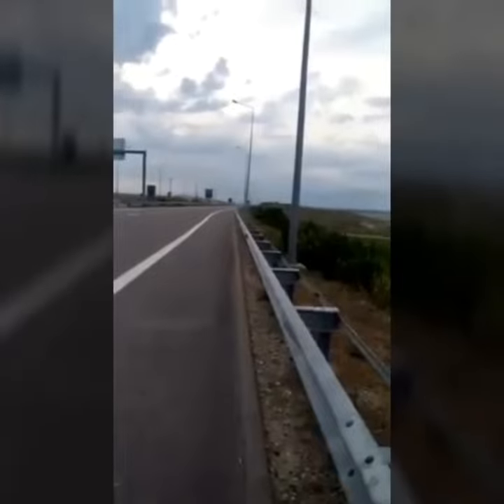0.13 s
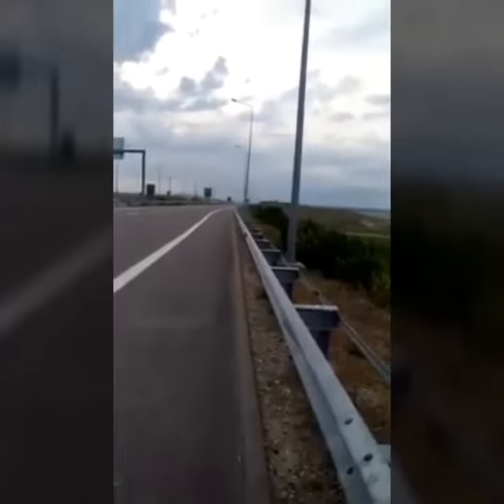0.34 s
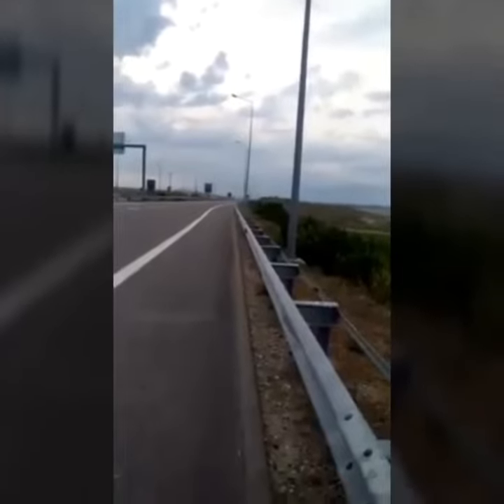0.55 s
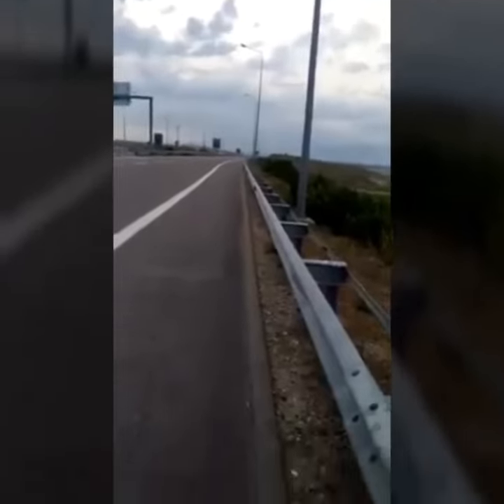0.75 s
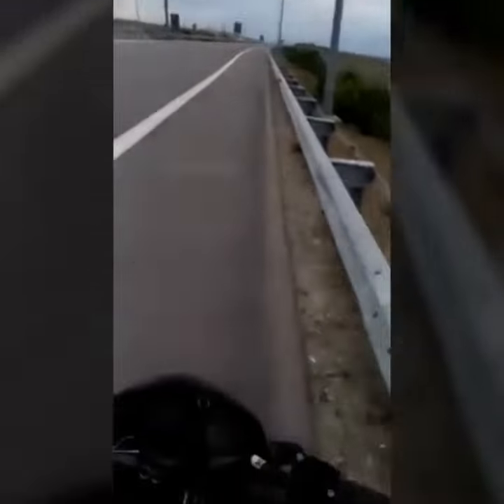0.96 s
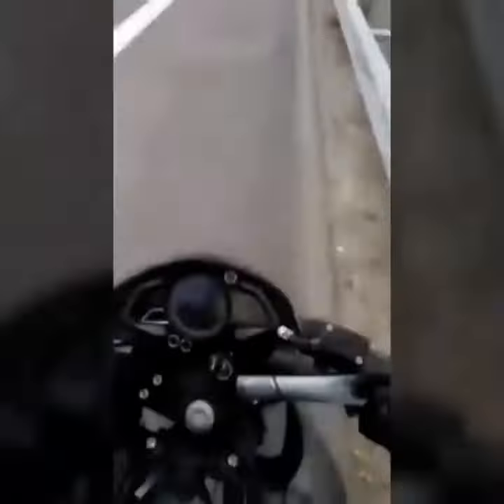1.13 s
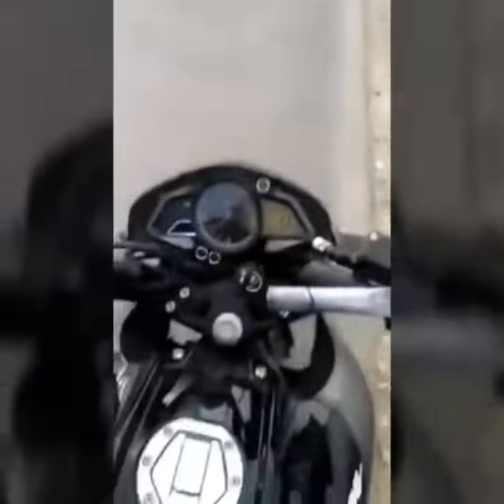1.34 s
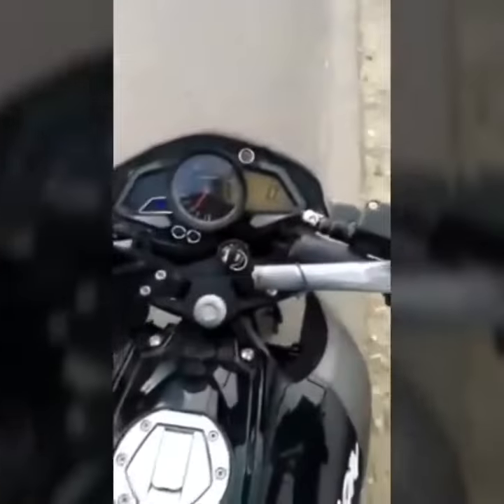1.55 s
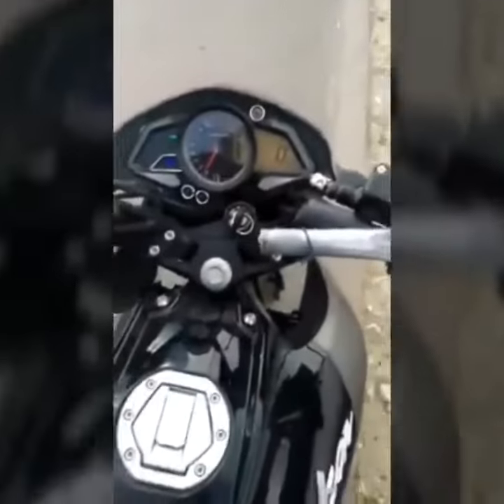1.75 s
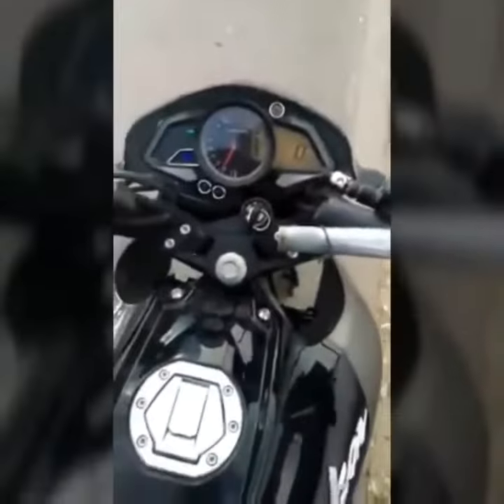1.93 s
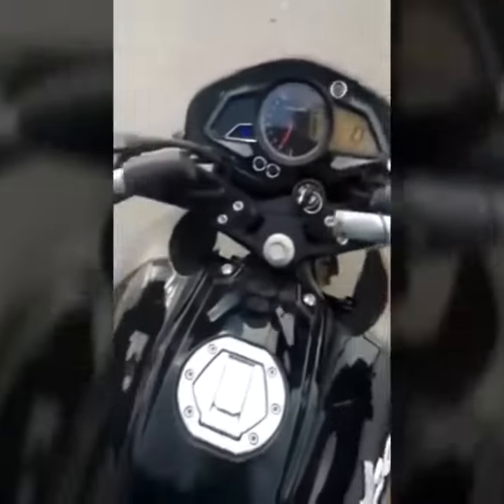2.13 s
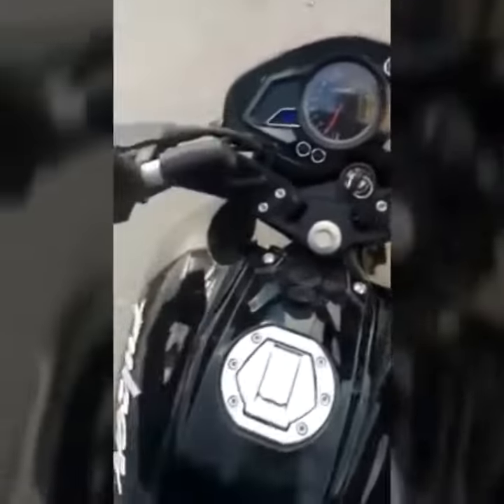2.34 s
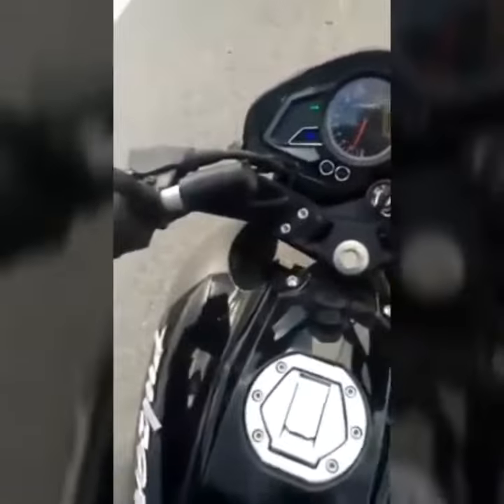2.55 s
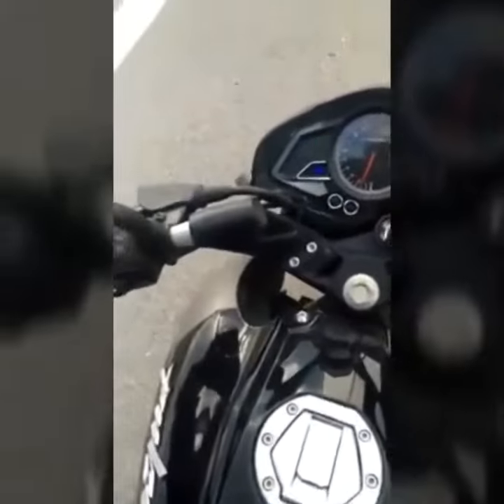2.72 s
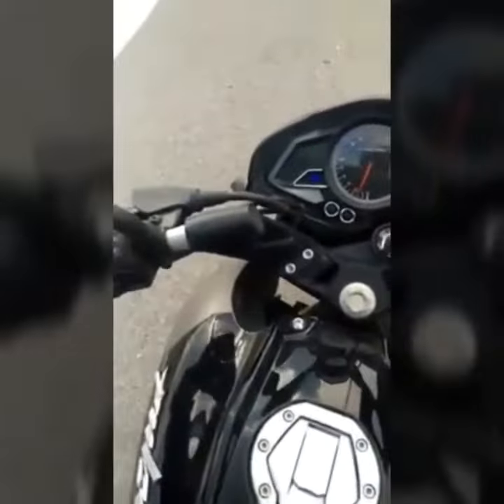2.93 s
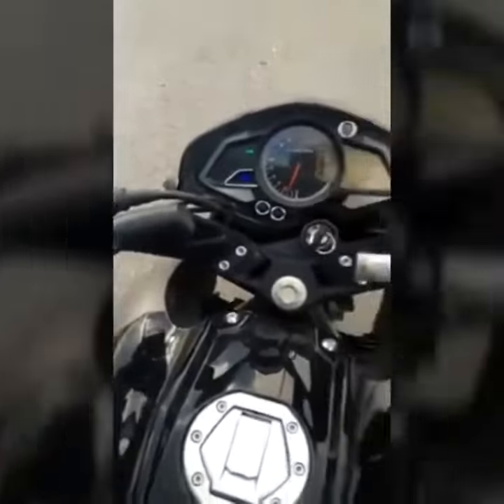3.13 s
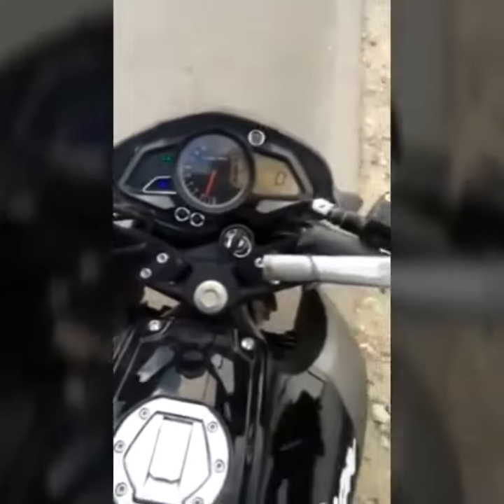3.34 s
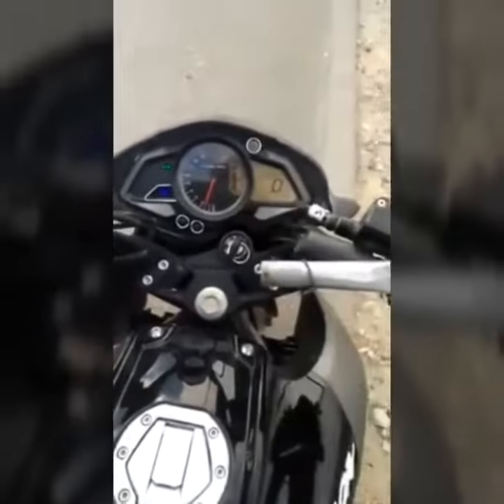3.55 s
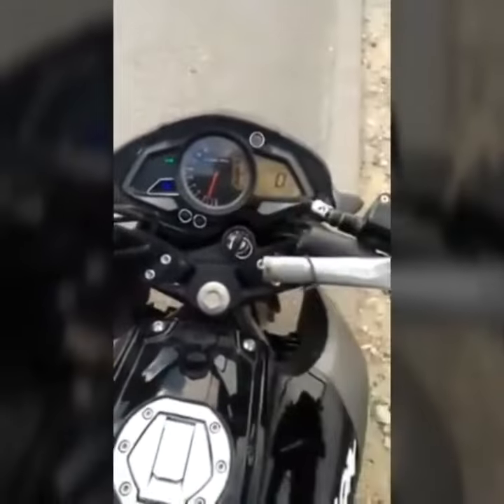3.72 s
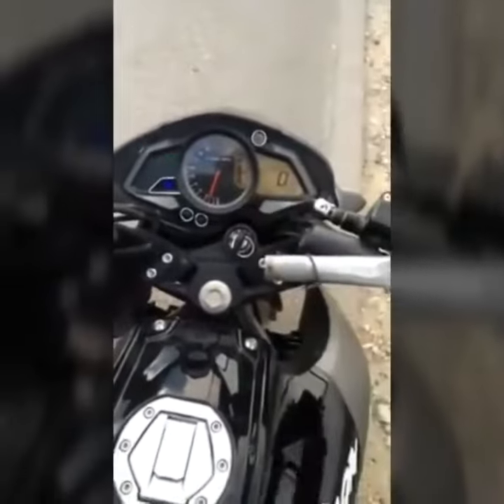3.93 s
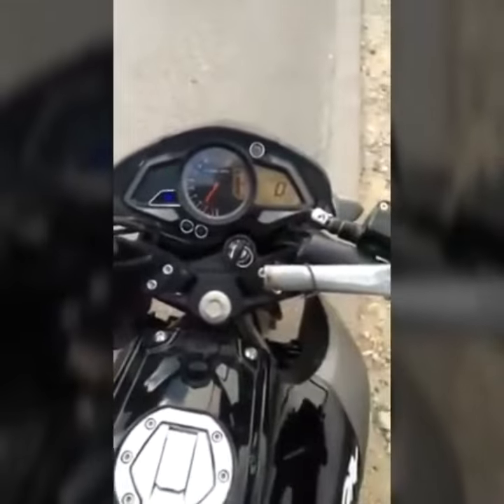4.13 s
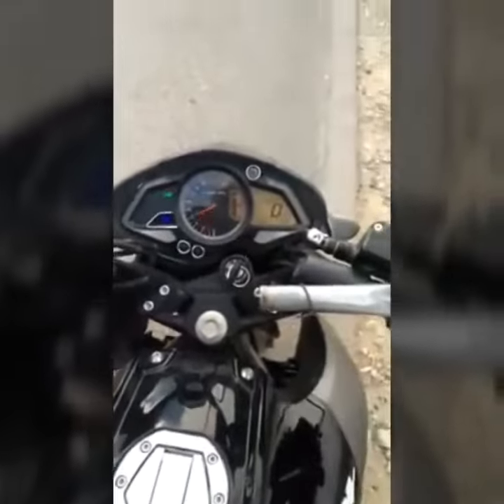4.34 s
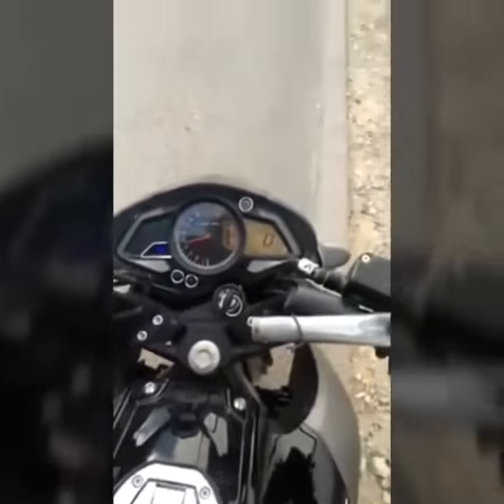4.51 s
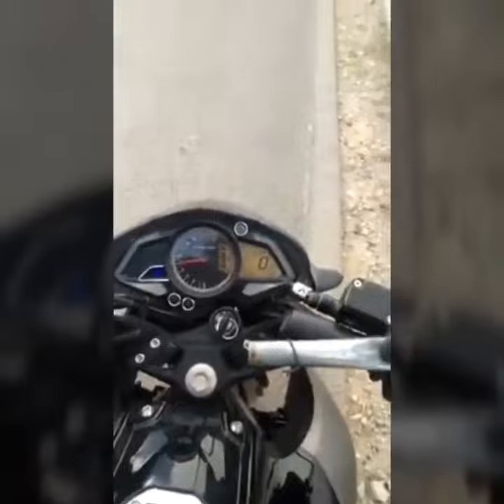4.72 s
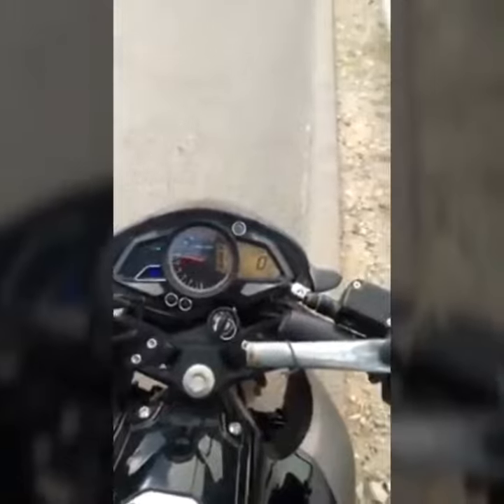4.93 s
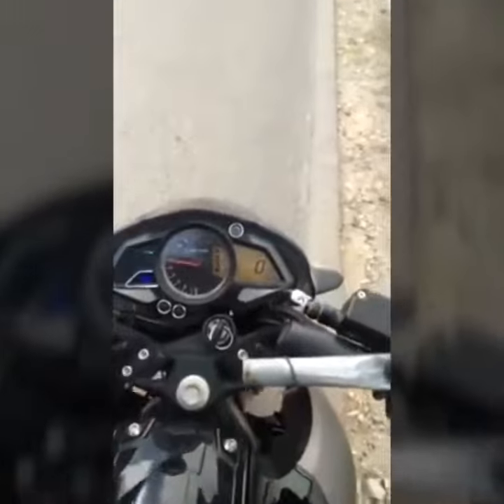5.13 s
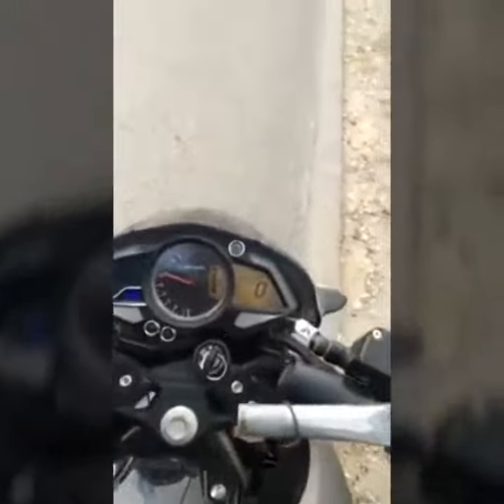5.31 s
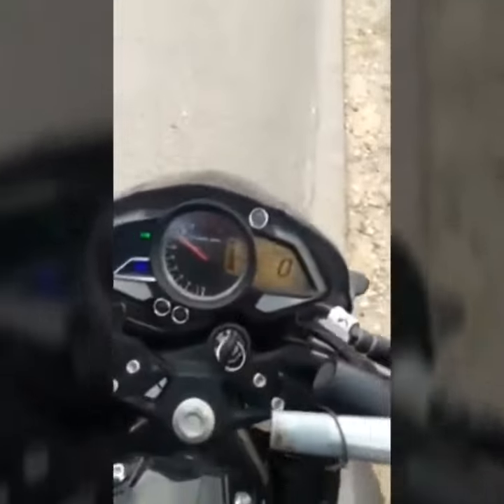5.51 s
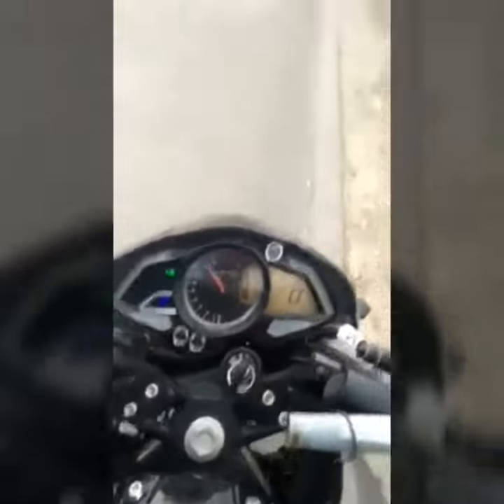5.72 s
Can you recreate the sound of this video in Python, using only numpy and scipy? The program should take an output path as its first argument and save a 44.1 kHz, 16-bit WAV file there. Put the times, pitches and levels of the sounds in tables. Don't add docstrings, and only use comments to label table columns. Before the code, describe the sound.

Close, narrow-band phone sound of a parked motorcycle being revved. A falling growl sinks into hollow exhaust thumps about twelve per second, with faint valve rattle, breathy gusts and a handling bump. Light taps precede the throttle, then three barking blips lead into a hard, steady, buzzing roar whose peaks clip and tick. Dry open roadside, only slight ground and barrier reflections.

```python
import sys
import numpy as np
from scipy import signal
from scipy.fft import rfft, irfft, next_fast_len
from scipy.io import wavfile
from scipy.ndimage import uniform_filter1d, map_coordinates

SR = 44100
rng = np.random.default_rng(int(sys.argv[2]) if len(sys.argv) > 2 else 0)


def ratio(d):
    e = np.asarray(d, float) / 20
    return 10 ** e


def output_pcm(signal):
    pcm = np.clip(np.atleast_2d(signal).T, -1, 1) * 32767
    wavfile.write(sys.argv[1], SR, np.round(pcm).astype(np.int16))


N = 258867
T = np.arange(N) / SR
FFT_SIZE = next_fast_len(N)

# (time [s], firing rate [Hz], level [dB])
FALL = [
    (0.0, 57.98, -14.5),
    (0.08, 54.95, -12),
    (0.43, 41.49, -11.5),
    (0.591, 35.45, -15.5),
    (0.79, 28.2, -14.5),
    (0.926, 24.65, -16),
    (1.0, 22.53, -19),
]
# (time of the pressure dip [s], strength [dB])
THUDS = [(1.687, 0), (1.763, -4), (1.857, 0.5), (1.94, 0), (2.02, -2.5), (2.1111, 0), (2.197, -2),
         (2.283, -1), (2.369, -3.5), (2.448, 0), (2.5244, -2), (2.605, -0.5), (2.687, -3.5), (2.772, -2),
         (2.8574, -1), (2.948, -1), (3.033, -0.05), (3.109, -1.5), (3.193, 1), (3.272, 0.5), (3.3535, 0),
         (3.432, 0.5), (3.505, -9), (3.531, -7), (3.600, 0), (3.685, 0), (3.767, 1), (3.833, 3)]
# (centre [Hz], width [Hz], peak pressure [1], onset after the dip [s])
EXHAUST = [
    (80, 60, -.23, .0003),
    (171, 87, -.17, -.006),
    (305, 65, .133, -.0079),
    (462, 119, .036, -.005),
]
# (time [s], firing rate [Hz], level [dB])
BLIP_1 = [
    (3.9, 29.25, -19),
    (3.958, 35.54, -12.5),
    (4.012, 42.07, -10.5),
    (4.046, 45.14, -11),
    (4.146, 42.2, -11),
    (4.39, 34.54, -14.5),
]
BLIP_2 = [
    (4.4, 36.79, -13),
    (4.448, 39.43, -11.5),
    (4.508, 49.6, -8),
    (4.59, 58.38, -9.5),
    (4.622, 58.24, -12.5),
    (4.93, 44.17, -10),
]
BLIP_3 = [
    (4.94, 45.95, -9.5),
    (5.008, 53.66, -8),
    (5.055, 57.42, -13),
    (5.15, 54.47, -9.5),
]
FULL_SONG = [
    (5.16, 56.24, -7.5),
    (5.222, 60.63, -8),
    (5.276, 61.04, -6),
    (5.308, 62.1, -6.5),
    (5.394, 73.04, -5.5),
    (5.455, 74.63, -5),
    (5.664, 74, -5),
    (5.87, 70.94, -6.5),
]
REVS = BLIP_1 + BLIP_2 + BLIP_3 + FULL_SONG


def unit(x):
    return x / np.sqrt(np.mean(x ** 2))


def ring(x, hz, width):
    once = signal.butter(1, [hz - width / 2, hz + width / 2], "band", fs=SR, output="sos")
    return signal.sosfilt(once.repeat(2, axis=0), x)


def steady(x, span_s):
    k = int(span_s * SR)
    power = uniform_filter1d(uniform_filter1d(x ** 2, k), k)
    return x / np.sqrt(np.abs(power) + 1e-14)


def walk(rate, size=N):
    k = int(SR / rate)
    held = np.repeat(rng.standard_normal(size // k + 1), k)
    return 1.3 * uniform_filter1d(uniform_filter1d(held, k), k)[:size]


def clicks(times, sizes):
    place = np.clip(np.asarray(times) * SR, 0, N - 2)
    out, i = np.zeros(N), place.astype(int)
    np.add.at(out, i, sizes * (1 - place + i))
    np.add.at(out, i + 1, sizes * (place - i))
    return out


def swell(hz, width, peak, onset):
    since = np.maximum(np.arange(4096) / SR - .01 - onset, 0)
    decay = np.pi * width * since
    return peak * decay * np.exp(1 - decay) * np.cos(2 * np.pi * hz * since)


def throttle():
    # (time [s], held [s], share [0-1])
    snaps = [
        (3.9, .1, 0.52),
        (4.415, 0.13, 0.96),
        (4.959, 0.0684, 0.93),
        (5.17, 0.045, 0.7),
        (5.34, 0.035, .3),
    ]
    edge_s = 0.04
    return sum(np.interp(T, [s - edge_s, s, s + held, s + held + edge_s], [0, share, share, 0])
               for s, held, share in snaps)


def revving(table, first):
    # (centre [Hz], span [Hz])
    sections = [
        (80, 95),
        (200, 120),
        (300, 120),
        (540, 300),
        (1000, 500),
    ]
    # (level at 50 firings/s [dB], slope [dB/octave of speed], added on open throttle [dB])
    balance = [
        (-5, -4.5, 3),
        (-5, 3, -2),
        (-10, 3.5, 7),
        (-10.5, 10.5, 3.5),
        (-36.5, 7, 1.5),
    ]
    # (frequency [Hz], level [dB])
    pipe = [(25, -25), (50, -3), (85, 3), (135, -8), (165, 0.1), (195, -2.5), (220, 2), (245, 3),
            (300, 0.1), (370, -5), (440, 0), (600, 1), (670, -4), (740, -8), (970, 3), (1150, -2),
            (2600, -14)]
    # (firing rate [Hz], share [0-1])
    rough_by_speed = [
        (22, .45),
        (32, .42),
        (42, .33),
        (60, .26),
        (73, .15),
    ]
    order_speeds = [30, 43, 55, 61, 67, 73]
    order_db = [
        [-1, 2, 0.1, 1.5, -2, -1, -2, 4, 1, 3, -6, 2, -5, -1, 0.1, -2],
        [-4, -1, 2.5, 5.5, 3, -3, -4, 1, 3, 2, -10, 4, -8, -2, -4, -3],
        [-2, -3, -0.5, 3, -10, 7, 0.1, 4, 4, 3, -7, -1, -8, -2, -3, -4],
        [-3, 4, -3, 6, -3, -4, -2, -1, -2, -4, -1, -3, -4, -4, -1, -4],
        [-2.5, 3, -3, 4, -8, -11, 5, 6, 0.1, 5, 0.1, -4, 0.1, -1, 10, -14],
        [-1.5, -2, -3, 6.5, -12, 4.5, 0.1, 3.5, 6.5, -5, 10, -9, -1, 6, 11, -20],
    ]
    load_db = [5, 0.1, -2, -1, 8, -2, 0.1, -4, 1, -3, 2, 0.1]
    s, *columns = np.transpose(table)
    span = slice(max(int((s[0] - .02) * SR), 0), int((s[-1] + .02) * SR))
    t, step = T[span], 64
    hz, level_db = (np.interp(t, s, c) for c in columns)
    opening = throttle()[span]
    shares = [ratio(db + slope_db * np.log2(hz / 50) + open_db * opening) ** 2
              for db, slope_db, open_db in balance]
    section_db = [level_db + 10 * np.log10(share / sum(shares)) for share in shares]
    rough = np.clip(np.interp(hz, *np.transpose(rough_by_speed)) + .35 * opening, 0, .8)
    section_db[-1] = np.maximum(section_db[-1], np.interp(hz, [62, 71], [-60, -28.5]))
    cycles = first + np.cumsum(hz) / SR
    thud_lag = np.unwrap(np.angle(rfft(sum(swell(*mode) for mode in EXHAUST), 16384)))
    lag_hz = np.arange(len(thud_lag)) * SR / 16384

    centres, spans = np.transpose(sections)
    density = np.array(section_db)[:, ::step] - 10 * np.log10(spans)[:, None]
    slow_hz, slow_rough = hz[::step], np.minimum(rough[::step], .35)
    load = uniform_filter1d(1. * (np.gradient(slow_hz) > 0), size=20) * (slow_hz < 70)
    clean, lifts = 0, np.transpose(order_db)
    for k in range(1, 31):
        f = k * slow_hz
        place = np.interp(np.log(f), np.log(centres), np.arange(len(centres)))
        db = map_coordinates(density, [place, np.arange(len(f))], order=1)
        db += np.interp(f, *np.transpose(pipe))
        db += 10 * np.log10(2 * slow_hz)
        db += np.interp(slow_hz, order_speeds, lifts[k - 1]) if k <= len(lifts) else -5
        if k <= len(load_db):
            db += load_db[k - 1] * load
        db += min(k / 3, 1) * (.6 + 6 * slow_rough) * walk(17 * step, size=len(f))
        lag = np.interp(f, lag_hz, thud_lag)
        lag += np.clip((slow_hz / 50) ** 2, .6, 1.6) * rng.standard_normal()
        turn = 2 * np.pi * k * cycles + np.interp(t, t[::step], lag)
        clean = clean + np.interp(t, t[::step], ratio(db)) * np.cos(turn)

    gas = rng.standard_normal(len(t)) * np.exp(-(cycles % 1) / 0.54)
    roar = sum(ratio(db) * (f / 200) ** .45 * steady(ring(gas, f, .9 * width), .08)
               for (f, width), db in zip(sections[:4], section_db))
    roar = signal.sosfilt(signal.butter(6, 690, fs=SR, output="sos"), roar)
    fade = np.interp(t, [s[0] - .015, s[0], s[-1], s[-1] + 0.02], [0, 1, 1, 0])
    out, phase = np.zeros((2, N))
    out[span] = (np.sqrt(1 - rough ** 2) * clean + rough * roar) * fade
    phase[span] = cycles % 1
    return out, phase


def rattle(beat):
    # (frequency [Hz], level [dB])
    case_colour = [(540, -22), (700, -9), (790, -9), (980, -1), (1180, -5), (1400, -1), (2150, -3),
                   (2310, -4), (2400, -12), (2600, -8), (2780, -9), (2900, -3), (3050, -10), (3250, -17),
                   (3480, -17), (3600, -11), (3750, -18), (4500, -22)]
    # (level at 50 firings/s [dB], slope [dB/octave of speed], added on open throttle [dB], level at idle [dB])
    law = [
        (-33.5, 9.5, 4, -54.5),
        (-32.5, 11, 2.5, -53),
    ]
    # (time [s], level [dB])
    overrun = [
        (.4, 0),
        (.65, -3),
        (1.0, -4.5),
        (1.3, 0),
    ]
    idle_hz = 12
    idling = [(THUDS[0][0], idle_hz, 0), (THUDS[-1][0], idle_hz, 0)]
    s, speed, _ = np.transpose(FALL + idling + REVS)
    octaves, opening = np.log2(np.interp(T, s, speed) / 50), throttle()
    mid, treble = (ratio(db + slope_db * octaves + open_db * opening) ** 2 + ratio(idle_db) ** 2
                   for db, slope_db, open_db, idle_db in law)
    bins_hz = np.arange(FFT_SIZE // 2 + 1) * SR / FFT_SIZE
    colour = ratio(np.interp(bins_hz, *np.transpose(case_colour)))
    low, high, shared = 0, 0, walk(25)
    for hz in 640 * 2 ** np.arange(0, 2.9, .25):
        band = unit(ring(rng.standard_normal(N) * beat, hz, hz / 4))
        band = np.sqrt(hz) * ratio(shared + walk(16)) * band
        if hz < 1700:
            low = low + band
        else:
            high = high + band
    low, high = (steady(irfft(rfft(part, FFT_SIZE) * colour, FFT_SIZE)[:N], 0.09) for part in (low, high))
    return np.sqrt(mid) * low + np.sqrt(treble) * ratio(np.interp(T, *np.transpose(overrun))) * high


def murmur(thuds, gust_power):
    start, settled, end = FALL[-1][0], THUDS[0][0], REVS[0][0]
    pipe_db = -26 + np.interp(T, [start, settled, end - .1, end], [0.5, 0, 0, 8])
    after = signal.lfilter([1], [1, -np.exp(-1 / (0.035 * SR))], thuds)
    puffs = rng.standard_normal(N) * ratio(2.6 * walk(70)) * (.5 + 1.1 * after)
    sound = 1.4 * unit(ring(puffs, 100, 110))
    sound = sound + 1.75 * unit(ring(puffs, 233.9, 160))
    sound = sound + 0.043 * unit(ring(puffs, 450, 93))
    sound = signal.sosfilt(signal.butter(3, 480, fs=SR, output="sos"), sound)
    fade_db = np.interp(T, [start - .2, start - .1, end + 0.078, end + .1], [-40.0, 0, -0.5, -40.5]) - 4.5
    level = np.sqrt(ratio(pipe_db) ** 2 + ratio(6.5) ** 2 * gust_power)
    return ratio(fade_db) * level * unit(sound)


def idle():
    # (time of the pressure dip [s], strength [dB])
    settling = [(1.007, 0.58), (1.032, -7), (1.054, -0.5), (1.097, 0.5), (1.121, -5.5), (1.173, -2),
                (1.19, -5), (1.221, -5), (1.279, -0.2), (1.342, -2), (1.356, -3), (1.398, -2.5),
                (1.466, -1), (1.483, -6), (1.5336, -3), (1.603, -6.5), (1.628, -8)]
    # (time of the pressure dip [s], strength [dB])
    catching = [
        (3.877, 6),
        (3.912, 7),
        (3.943, 4),
    ]
    catch_db = [0.1, 5, -4, 1]
    # (delay [s], level [dB])
    roadside = [
        (.019, -13),
        (0.037, -12),
        (.052, -20.5),
    ]
    s, db = np.transpose(settling + THUDS + catching)
    *chance, tone = rng.standard_normal((len(s), len(EXHAUST) + 1)).T
    bright_db = -0.15 * db + .6 * tone + 0.1 * (s < THUDS[0][0])
    out = 0
    for k, mode in enumerate(EXHAUST):
        tilt_db = np.sign(k - .5) * np.clip(bright_db, -2, 5)
        mode_db = db + tilt_db + catch_db[k] * (s > THUDS[-2][0]) + .8 * chance[k]
        out = out + signal.fftconvolve(clicks(s - .01, ratio(mode_db)), swell(*mode))[:N]
    out = out + sum(ratio(echo_db) * np.roll(out, int(late * SR)) for late, echo_db in roadside)
    return out, clicks(s, ratio(db))


def gusts():
    # (time at full strength [s], held [s], time to rise 20 dB [s], level [dB], treble lift [dB])
    blows = [(1.5, .05, 0.04, -32, 1.5), (1.58, .04, 0.2, -38.5, 3), (1.7, 0.078, 0.03, -33.5, -4.5),
             (1.99, 0.035, 0.13, -36, 1), (2.35, 0.06, 0.11, -31.5, -3), (2.44, 0.09, 0.11, -28.5, -6.5),
             (2.57, .11, 0.1, -31, -2), (2.7, .09, 0.1, -32, 3), (2.94, .06, 0.04, -39, 1),
             (3.03, .15, 0.09, -33, 2), (3.42, .02, .03, -45, 2)]
    # (time at full strength [s], held [s], time to rise 20 dB [s], level [dB],
    # treble lift [dB])
    bursts = [
        (2.11, 0.06, 0.077, -38, 4),
        (2.187, 0.004, 0.015, -24, -6),
        (2.22, .002, 0.019, -29, -3),
        (3.754, .02, 0.0093, -39.5, 0.5),
        (3.824, .022, .008, -32.5, -0.5),
        (3.869, .02, .005, -30, 1),
    ]
    fade_s = 0.054
    power = np.zeros((2, N))
    for s, held, rise, db, treble_db in blows + bursts:
        span = slice(int((s - 2 * rise) * SR), int((s + held + 2 * fade_s) * SR))
        before, after = np.maximum(s - T[span], 0), np.maximum(T[span] - s - held, 0)
        shape = ratio(db - 20 * before / rise - 20 * after / min(rise, fade_s)) ** 2
        power[:, span] += np.outer([1, ratio(treble_db) ** 2], shape)
    return power


def wind(power):
    # (frequency [Hz], level [dB])
    port_colour = [(260, -14.5), (450, 3.5), (592, -9.5), (996, -9), (1660, -14), (2000, -20.5),
                   (2610, -17.5), (4310, -27), (5600, -53.5), (9480, -120)]
    hz = np.arange(FFT_SIZE // 2 + 1) * SR / FFT_SIZE
    points_hz, db = np.transpose(port_colour)
    rush = rfft(rng.standard_normal(N) * ratio(1.8 * walk(60)), FFT_SIZE)
    rush = rush * ratio(np.interp(np.log(hz + 1), np.log(points_hz), db))
    rush = rush * hz ** 4 / (hz ** 4 + 420 ** 4)
    share = hz ** 4 / (hz ** 4 + 1700 ** 4)
    body, treble = irfft([rush * (1 - share), rush * share], FFT_SIZE)[:, :N]
    body = body + ratio(0.5) * np.std(body) * unit(ring(rng.standard_normal(N), 85, 80))
    blown = np.sqrt(power[0]) * body + np.sqrt(power[1]) * ratio(0.9 * walk(29)) * treble
    return blown / np.std(body + treble)


def bark(phase):
    fired = np.flatnonzero(np.diff(phase) < -.5)
    strength = ratio(2.5 * rng.standard_normal(len(fired))) * throttle()[fired] ** 2
    strikes = clicks(T[fired], strength) + clicks([3.836], ratio(-6))
    crack = swell(572, 110, 1.6, -.01) + 0.75 * swell(270, 90, 2.5, -.006)
    return ratio(-17) * signal.fftconvolve(strikes, crack)[:N]


def overload(sound):
    # (time [s], peak level [dB])
    peaks = [(4.5421, -38.5), (4.5544, -46), (5.1756, -41.5), (5.2155, -40.5), (5.2525, -40.5),
             (5.2649, -35.5), (5.2979, -38.5), (5.3104, -44), (5.3338, -38), (5.3602, -42.5), (5.3857, -43),
             (5.4231, -47.5), (5.437, -41), (5.45, -36), (5.4635, -36.5), (5.4774, -38), (5.4904, -40.5),
             (5.5044, -38.5), (5.5209, -40.5), (5.5443, -34.5), (5.5613, -38.5), (5.5742, -38.5),
             (5.5854, -44), (5.6017, -43), (5.6151, -39.5), (5.6421, -38.5), (5.66, -35), (5.6825, -32.5),
             (5.6964, -38.5), (5.7074, -42.5), (5.7194, -35.5), (5.7374, -41), (5.7443, -36),
             (5.7643, -41.5), (5.7778, -34), (5.7904, -41), (5.8024, -45), (5.8162, -41.5), (5.8301, -39),
             (5.8444, -35.5)]
    tick_s, tick_db, flat_s, fizz_s = .00009, 24.5, .0004, .0025
    s, db = np.transpose(peaks)
    size, chance = ratio(db + tick_db + 15), rng.random((len(s), 3)).T
    decay, fizz_decay, ticks = np.exp(-1 / (tick_s * SR)), np.exp(-1 / (fizz_s * SR)), 0
    for k, top_hz in enumerate([8000, 11000, 13500]):
        own = size * ((3 * chance[2]).astype(int) == k)
        corners = clicks(s + 0.0012, own) + clicks(s + .001 + flat_s * (.3 + chance[0]), own * chance[1])
        corners = corners + 0.3 * np.roll(corners, -140)
        fizz = 0.06 * signal.filtfilt([1], [1, -fizz_decay], corners) / (fizz_s * SR)
        fizz = fizz * rng.standard_normal(N)
        tick = signal.filtfilt([1 - decay], [1, -decay], corners + fizz)
        ticks = ticks + signal.sosfiltfilt(signal.butter(5, top_hz, fs=SR, output="sos"), tick)
    grit = ratio(-55) * np.minimum(np.abs(sound), .45) ** 1.5 * rng.standard_normal(N)
    grit = signal.sosfilt(signal.butter(3, 5500, fs=SR, output="sos"), grit)
    hiss = signal.lfilter([1], [1, -.8], rng.standard_normal(N))
    above = signal.butter(4, 4700, "high", fs=SR, output="sos")
    return signal.sosfiltfilt(above, ticks + grit) + ratio(-96) * hiss


def starve(x):
    f, _, z = signal.stft(x, SR, nperseg=2304)
    power = np.abs(z) ** 2 + 1e-20
    around = np.abs(uniform_filter1d(power, size=9, axis=0)) + 1e-16
    contrast = np.minimum(power / around, 9) ** .4
    patches = np.kron(rng.standard_normal((len(f) // 8 + 1, z.shape[1] // 2 + 1)), np.ones((8, 2)))
    patches = patches[:len(f), :z.shape[1]]
    depth = np.clip((f[:, None] - 900) / 2500, 0, 1)
    patch_db = depth * (2.5 * patches - 12 * (patches < -1.3))
    gain = np.where(f[:, None] > 720, contrast * ratio(patch_db), 1)
    treble_db = 10 * np.log10(power[(f > 3000) & (f < 4200)].mean(axis=0))
    lift_db = treble_db - uniform_filter1d(treble_db, size=30)
    scatter = uniform_filter1d(rng.standard_normal(len(lift_db)), size=2) * 1.4
    top_hz = 4470 + 25 * lift_db + 170 * scatter
    return signal.istft(z * gain * (f[:, None] < top_hz), SR, nperseg=2304)[1][:N]


def scene():
    fall, fall_phase = revving(FALL, first=.3)
    blips, blip_phase = revving(REVS, first=0.1003)
    thump, thuds = idle()
    blowing = gusts()
    tick = signal.lfilter([1], [1, -np.exp(-1 / (0.007 * SR))], thuds)
    revved_beat = 1 + 0.26 * np.exp(-(fall_phase + blip_phase) / 0.56)
    beat = np.where((T < 1) | (T > 3.9), revved_beat, 0.58 + .5 * tick)
    engine = fall + blips + bark(blip_phase) + thump + murmur(thuds, blowing[0])
    return (engine + rattle(beat) + wind(blowing))[None]


def low_pass(x):
    return signal.sosfilt(signal.butter(12, 15700, fs=SR, output="sos"), x)


def record(dry):
    air = signal.sosfiltfilt(signal.butter(3, 44, "high", fs=SR, output="sos"), dry[0])
    rounded = air / (1 + np.abs(air) ** 8) ** (1 / 8)
    narrow = signal.ellip(9, .2, 50, 4700, fs=SR, output="sos")
    sound = signal.sosfiltfilt(narrow, starve(rounded))
    since = T - 4.7405
    jump = ratio(-4) * np.where(since > 0, .4, -.9)
    sound = sound + (jump - sound) * np.exp(-np.abs(since) / .0007)
    mix = (np.clip(sound, -1, 1) + overload(sound))[None]
    return low_pass(mix)


dry = scene()
out = record(dry)
output_pcm(out)
```